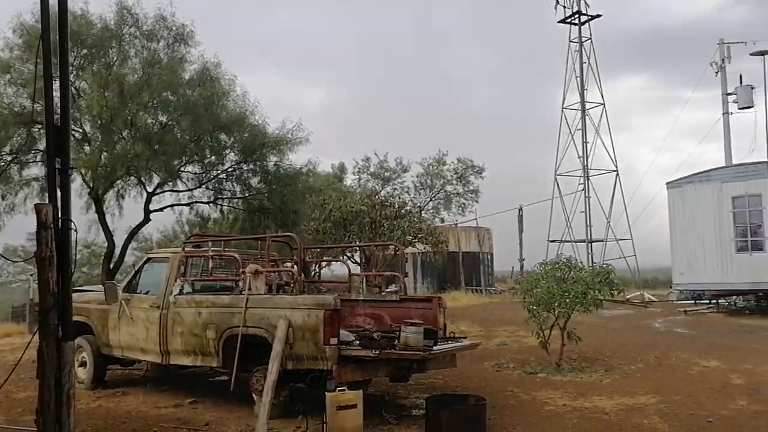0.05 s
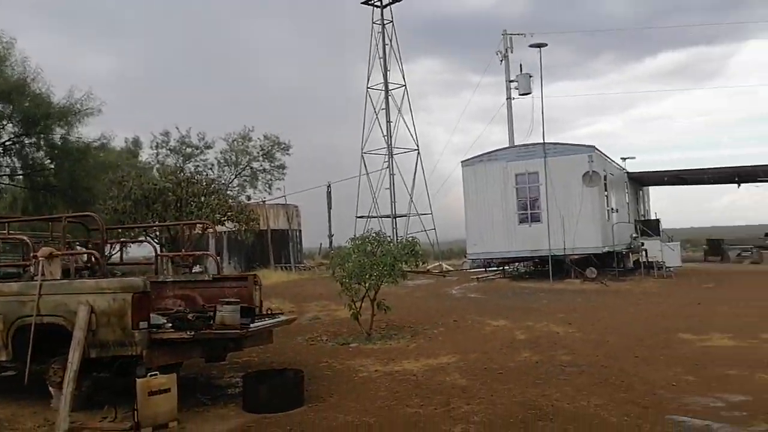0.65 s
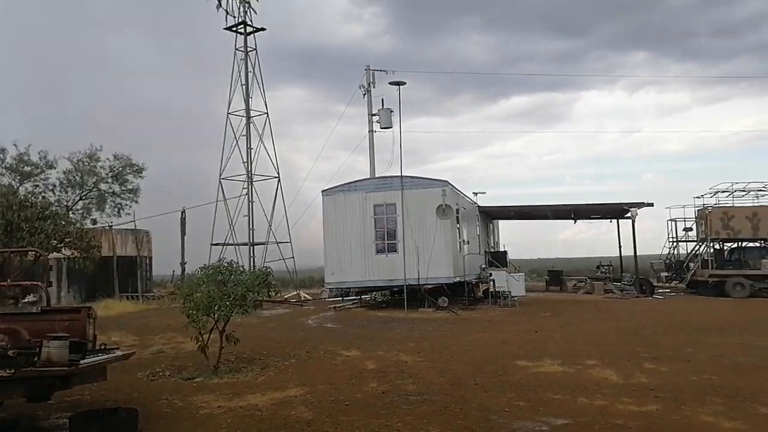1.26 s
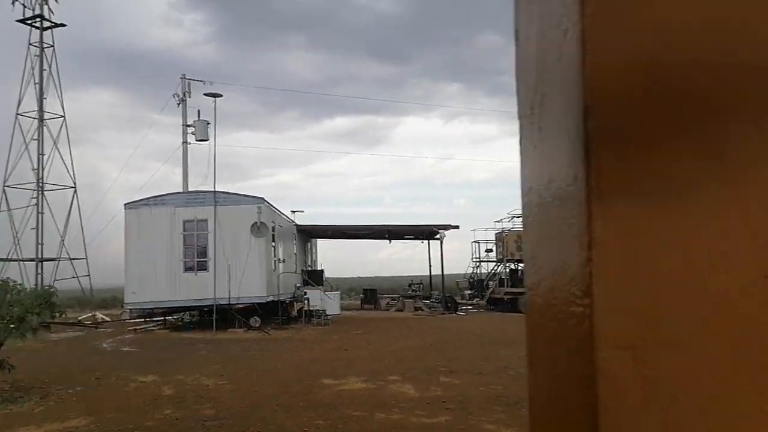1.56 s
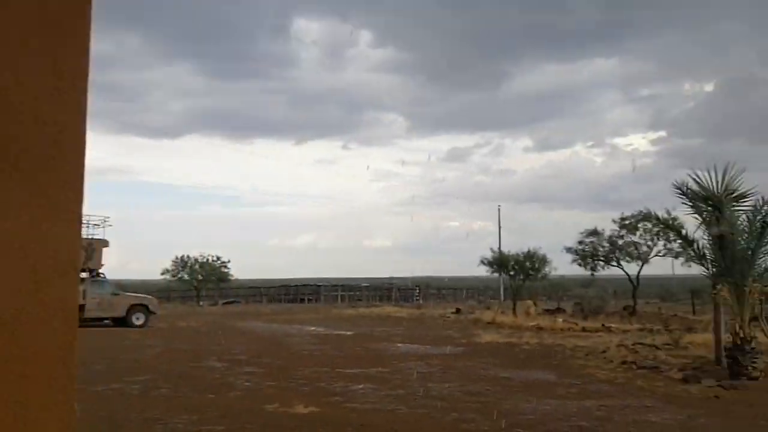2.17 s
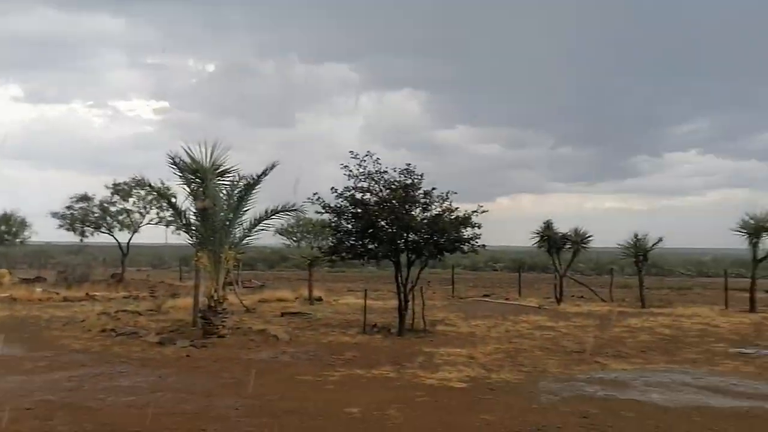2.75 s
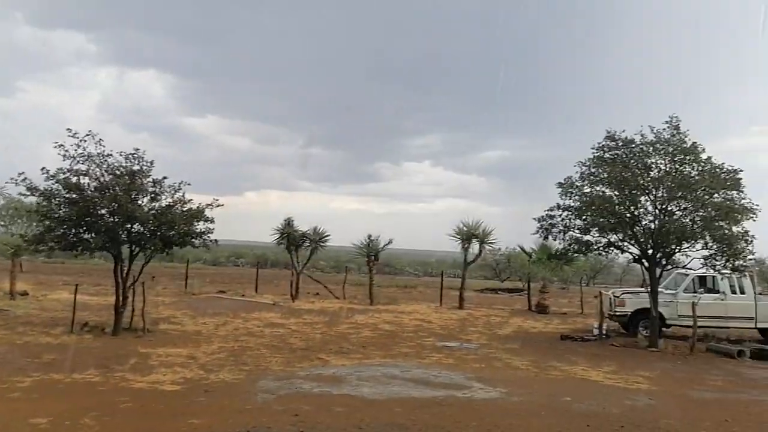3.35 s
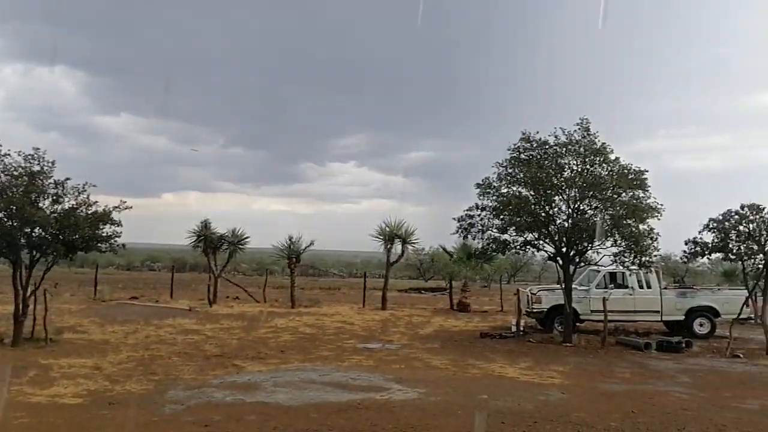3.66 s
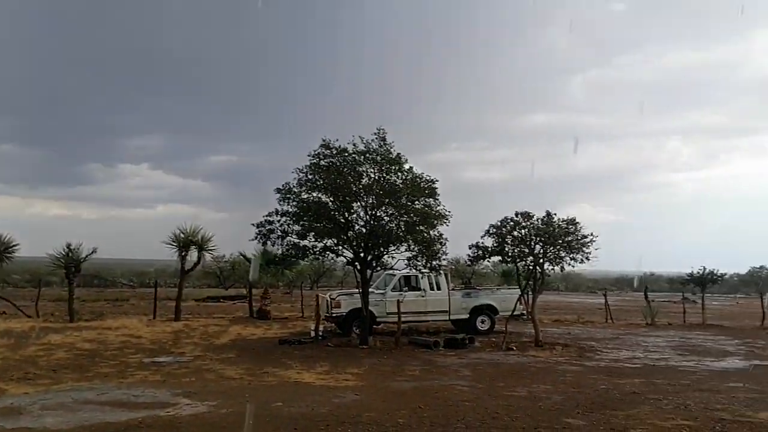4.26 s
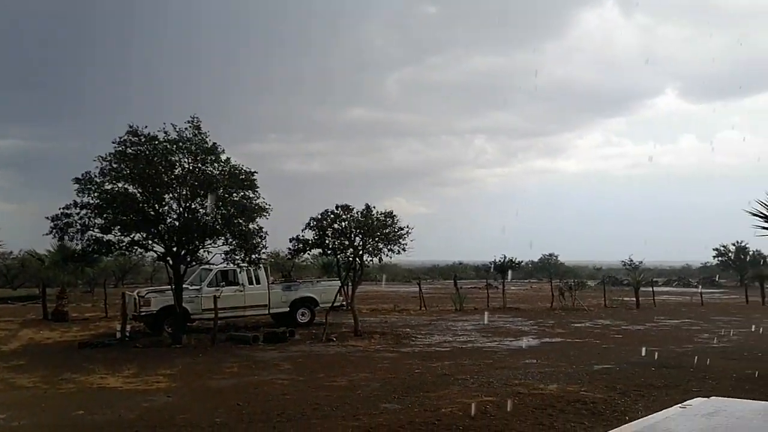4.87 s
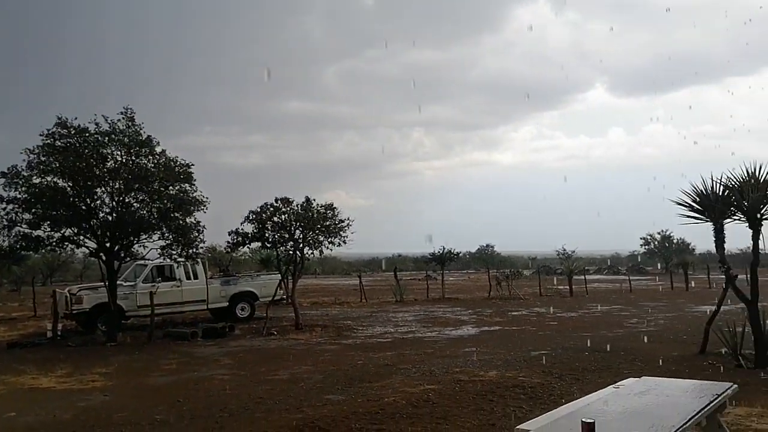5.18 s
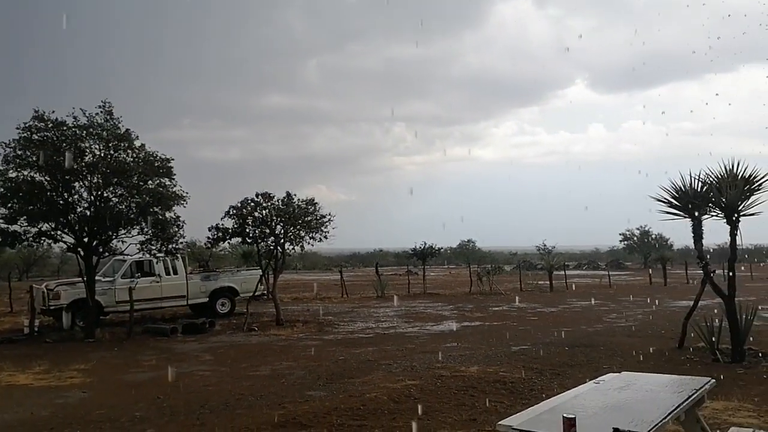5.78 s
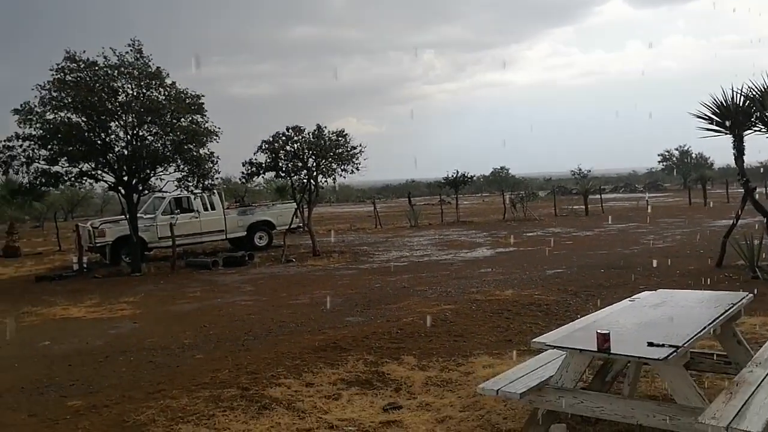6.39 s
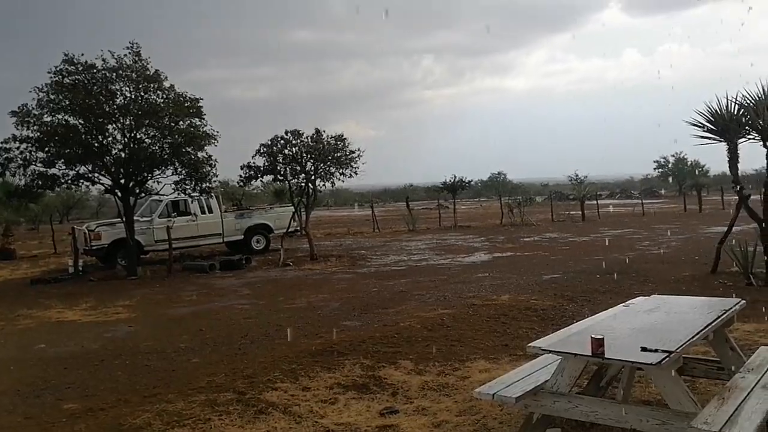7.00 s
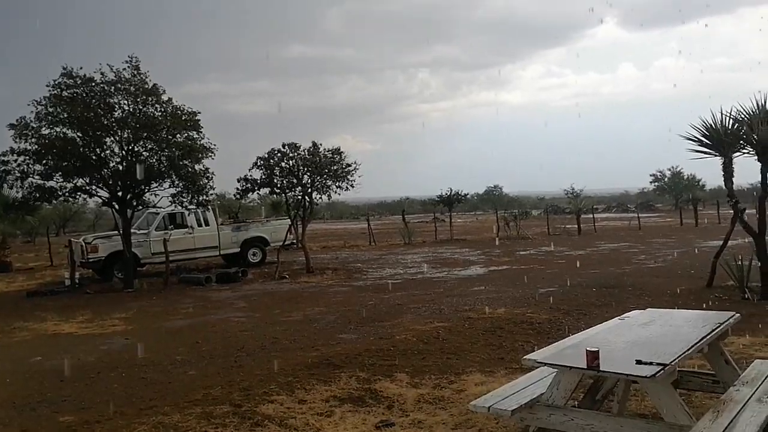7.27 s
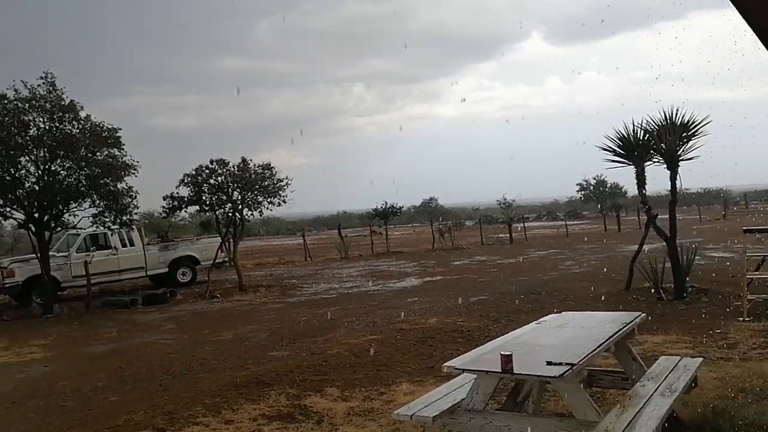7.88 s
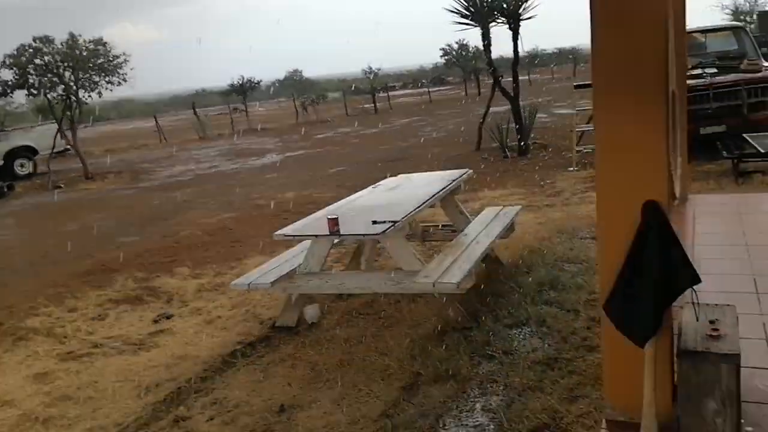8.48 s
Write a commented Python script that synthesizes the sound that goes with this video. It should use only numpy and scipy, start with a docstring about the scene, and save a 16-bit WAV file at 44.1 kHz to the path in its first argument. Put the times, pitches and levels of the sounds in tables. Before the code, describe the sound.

Light rain falls steadily on a dirt yard, heard from a small microphone under a porch roof. Wind buffets the microphone at first, then a loose metal fitting rattles briefly. Faint drumming on distant sheet metal fades away, while close drops tick and spatter and bigger drips tap the ground. Near the end a door bumps and shuts with a boom, a wooden slap and a clattering latch as the rain continues.

```python
"""Steady light rain on a dirt yard, heard from one small microphone under a porch roof.
Far off, countless drops merge into a wash, and sheet metal drums until the microphone turns away.
Close by, drops tick and spatter and big drips tap the ground, echoed by the roof and walls.
Wind buffets the microphone, hardest at first, and a loose metal fitting rattles early on.
Near the end a door bumps and shuts: its panel booms, the wood slaps and the latch clatters."""
import sys
import numpy as np
from scipy import signal
from scipy.fft import rfft, irfft, next_fast_len
from scipy.io import wavfile
from scipy.ndimage import uniform_filter1d

SR = 44100
rng = np.random.default_rng(int(sys.argv[2]) if len(sys.argv) > 2 else 0)


def file_out(sig):
    """Save sig as 16-bit WAV at sys.argv[1]."""
    # one column per channel
    cols = np.atleast_2d(sig).T
    # limit, then scale
    lim = np.clip(cols, -1, 1)
    pcm = np.round(lim * 32767).astype(np.int16)
    wavfile.write(sys.argv[1], SR, pcm)


N = 376613
TIME = np.arange(N) / SR

# spectra of the far rain, the yard's murmur and the hiss of fine spray: f/Hz, level/dB
MURMUR_COLOUR = [(30, -14.5), (100, -15), (170, -4), (280, 1), (420, -3.5), (650, -6.5), (1000, -8),
                 (1450, -9.5), (2300, -6), (3200, -9.5), (4000, -15.5), (5200, -29), (8000, -66)]
SPRAY_COLOUR = [(2100, -25.5), (3400, -20), (4200, -1.5), (5100, 8), (5900, 6.5), (6900, 5), (7400, 5),
                (7800, -5.5)]
# course of the far rain: t/s, murmur level/dB, spray level/dB
RAIN_LEVELS = [(0.0, -61, -58.5), (0.19, -61, -57.5), (1.57, -59, -54.5), (2.71, -60.5, -57.5),
               (2.95, -60.5, -55), (3.92, -62, -56.5), (4.26, -61.5, -56), (6.35, -60.5, -56.5),
               (7.09, -59.5, -54.5), (7.52, -60.5, -55.5), (8.13, -60.5, -54.5), (8.54, -57.5, -52)]
# strength of the near drops by pitch: f/Hz, level/dB
NEAR_DROP_COLOUR = [(1800, -13.5), (2600, -7), (3300, 0.5), (3900, -7), (5100, 12), (5900, -12.5),
                    (7000, 4.5), (7500, -3)]

# gusts on the microphone: t/s, hold/s, level/dB
WIND_GUSTS = [(0.057, .19, -30.5), (0.303, 0.23, -37.5), (0.529, 0.23, -33.5), (0.798, 0.058, -38),
              (1.184, 0.5, -44.5), (1.306, .11, -39), (2.1, .34, -63), (5.1, .14, -60.5),
              (5.646, .025, -52), (5.932, .13, -48.5), (6.418, 0.36, -60.5), (6.93, 0.27, -52.5),
              (7.402, .03, -51), (7.803, 0.039, -45), (8.0, 0.037, -48), (8.237, 0.16, -56)]
# spectra of a light breeze, a full gust and the small eddies riding on large ones: f/Hz, level/dB
BREEZE_COLOUR = [(15, -4), (35, 4.5), (80, 6), (130, -5.5), (200, -17.5), (300, -33.5), (600, -55),
                 (1200, -79.5)]
GUST_COLOUR = [(15, -5), (40, -4.5), (110, 0.5), (190, -5), (300, -14), (450, -24), (700, -49), (1200, -64),
               (2500, -91)]
SPUTTER_COLOUR = [(100, -24), (250, 2), (450, 2), (700, -15), (950, -44), (1600, -62.5)]
# the strongest eddies that slap the microphone: t/s, level/dB, f/Hz
STRONG_EDDIES = [(0.063, -19, 152), (0.132, -19, 170), (.193, -24, 200), (0.242, -13.5, 158),
                 (0.249, -15, 324), (.323, -23.5, 218), (0.535, -23, 308), (0.551, -16.5, 135),
                 (.565, -25, 333), (.577, -21.5, 308), (0.637, -20, 320), (0.716, -21, 190),
                 (.763, -24.5, 270)]

# big drips on the ground: t/s, relative level/dB, f/Hz
BIG_DRIPS = [(0.7182, -37.5, 5500), (1.2295, -44, 6400), (1.8864, -43, 6660), (2.8738, -28.5, 4990),
             (3.373, -45, 2700), (3.669, -43.5, 6060), (3.791, -37.5, 5100), (3.9234, -45, 5200),
             (4.1592, -43, 5200), (4.1944, -36.5, 4860), (4.6503, -42, 5060), (4.6955, -42, 5300),
             (5.3627, -39.5, 5950), (5.672, -47.5, 1950), (5.796, -44, 6340), (5.9706, -41.5, 7000),
             (6.09, -42, 6340), (6.114, -42, 6860), (6.56, -43.5, 3370), (6.743, -41, 5860),
             (6.8575, -42, 6400), (7.1278, -33, 4830), (8.062, -39.5, 3170), (8.522, -35.5, 3530)]

# knocks of the loose metal fitting: t/s, level/dB
FITTING_KNOCKS = [(1.536, -38.5), (1.54, -43.5), (1.552, -40), (1.561, -42.5), (1.592, -44.5), (1.620, -50)]
# spectrum of one knock: f/Hz, level/dB
KNOCK_COLOUR = [(200, -22), (380, 1.5), (820, -1), (1200, -5), (1500, -12.5), (2500, -13), (3100, -4),
                (4000, -13.5), (4500, -6), (5500, -4.5), (6200, -23), (7000, -12.5), (7800, -20)]
# modes of the fitting: f/Hz, level/dB, t60/s
FITTING_MODES = [(416.5, 3.5, 0.22), (836, 0.5, 0.18), (1244, -7, 0.12), (3120, -9, 0.12), (4560, 1, 0.2),
                 (4670, -7, 0.17), (5340, -5, 0.22), (5400, -10, 0.23), (6970, -9, .12)]

# blows of the door: t/s, thud level/dB, slap level/dB, latch level/dB, rise/s, hardness/(dB per octave)
DOOR_IMPACTS = [(6.857, -31, -39.5, -68, 0.00075, 1.5), (7.075, -52, -65, -43.5, 0.001, -10),
                (7.146, -23.5, -42, -45, 0.0045, -2), (7.172, -38, -36, -34.5, 0.0048, 1),
                (7.219, -43.5, -42, -33.5, 0.0049, 1)]
# modes of the door panel: f/Hz, level/dB, t60/s
PANEL_MODES = [(147, 2.5, 0.23), (181, -1.5, 0.36), (201, -7.5, 0.52), (242, -12, 0.17), (305.4, 3.5, 0.17),
               (355, 3.5, 0.21), (408, 2.5, 0.27), (503, -15, 0.19), (604, -4.5, 0.28), (680, -5, 0.3),
               (1026, -18, 0.35), (1299, -16.5, 0.35), (1670, -22, 0.28), (1790, -20, .22),
               (2030, -17, .18)]
# spectra of the panel's thud, the wooden slap and the latch: f/Hz, level/dB
THUD_COLOUR = [(60, -32), (130, -5), (330, 1.5), (520, -6), (750, -11.5), (1200, -27), (3000, -63)]
SLAP_COLOUR = [(300, -11), (700, 6.5), (1400, 0), (2100, 2), (2800, -15), (4000, -36), (7500, -38)]
LATCH_COLOUR = [(1500, -13.5), (3200, 0.5), (3900, -6.5), (4700, 4), (5500, 1.5), (6300, -2), (7050, 1),
                (7700, -14.5)]

# response of the microphone, with a notch and a port resonance: f/Hz, level/dB
MIC_RESPONSE = [(20, 0), (3100, -0.5), (3850, -4), (4700, -3), (6100, 2), (6600, 6.5), (7000, 11),
                (7300, 6), (7600, -7), (7850, -30.5), (8300, -38)]


def amp(db):
    """Decibels to gain."""
    return 10 ** (np.asarray(db) / 20)


def unit_rms(x):
    """Scales to rms 1."""
    return x / np.sqrt(np.mean(x ** 2) + 1e-20)


def level_at(colour, hz):
    """A spectrum's level in dB, joined on a log-frequency axis."""
    f, db = np.transpose(colour)
    return np.interp(np.log(hz + 1), np.log(f + 1), db)


def ramp(start_s, length_s):
    """Rises evenly from 0 to 1, then stays."""
    return np.clip((TIME - start_s) / length_s, 0, 1)


def add(mix, s, sound):
    """Adds a sound to the mix at time s."""
    part = mix[max(round(s * SR), 0):][:len(sound)]
    part += sound[:len(part)]


def noise(colour, size):
    """Noise of rms 1 with a given spectrum."""
    gain = amp(level_at(colour, np.fft.rfftfreq(size, 1 / SR)))
    return unit_rms(irfft(rfft(rng.standard_normal(size)) * gain, size))


def burst(colour, t, t60):
    """Modes too dense to tell apart: dying noise."""
    return noise(colour, len(t)) * amp(-60 * t / t60)


def shower(colour, patch_db, flicker_db):
    """Countless far drops: noise with drifting patches and a quick flicker shared by all pitches."""
    hz = np.fft.rfftfreq(512, 1 / SR)
    real, imag, patches = rng.standard_normal((3, N // 128 + 5, len(hz)))
    patches = uniform_filter1d(patches, size=16, axis=0)  # smooth in time
    patches = unit_rms(uniform_filter1d(patches, size=9, axis=1))  # and in pitch
    flicker = unit_rms(uniform_filter1d(rng.standard_normal(len(real)), size=5))[:, None]
    field = (real + 1j * imag) * amp(level_at(colour, hz) + patch_db * patches + flicker_db * flicker)
    return unit_rms(signal.istft(field.T, nperseg=512, noverlap=384)[1][:N])


def far_rain(murmur_gain_db=4.0, spray_gain_db=-5.0, swell_db=0.64):
    """The wash of the whole yard from a distance: a low murmur under spray that comes in waves."""
    times, murmur_db, spray_db = np.transpose(RAIN_LEVELS)
    swell = noise([(.3, -6.5), (2.5, 0.5), (6, -18.5), (20, -70), (100, -120)], N)
    murmur = shower(MURMUR_COLOUR, patch_db=1.1, flicker_db=0.9)
    murmur *= amp(np.interp(TIME, times, murmur_db) + murmur_gain_db)
    spray = shower(SPRAY_COLOUR, patch_db=1.0, flicker_db=1.0)
    spray *= amp(np.interp(TIME, times, spray_db) + spray_gain_db + swell_db * swell)
    return murmur + spray


def sheet_metal(level_db=-63.5, turned_away_db=-12):
    """Hollow drumming on sheet metal across the yard, fading as the microphone turns away."""
    drumming = noise([(500, -49.0), (800, -8.0), (970, -2.0), (1150, -8.0), (1700, -32.0)], N)
    return amp(level_db + turned_away_db * ramp(start_s=2.12, length_s=0.65)) * drumming


def tick(hz, t60):
    """The impact of a drop: a few cycles with a soft start, of energy 1."""
    t = np.arange(1024) / SR
    wave = np.sin(2 * np.pi * hz * t) * amp(-60 * t / t60) * (1 - np.exp(-t / 0.00015))
    return wave / np.linalg.norm(wave)


def splat(hz, t60, splash_db, splash_t60):
    """A drop on wet ground: the impact, then a brief fizz of spray around the same pitch."""
    t = np.arange(2048) / SR
    band = [(hz / 2, -30), (hz * .8, -5), (hz, 0), (hz * 1.25, -5), (hz * 2, -30)]
    spray = burst(band, t, splash_t60) * (1 - np.exp(-t / 0.00056))
    out = amp(splash_db) * spray / np.linalg.norm(spray)
    add(out, 0, tick(hz, t60))
    return out


def porch(x, wet_db, t60, echoes_per_s=2500):
    """Adds scattered reflections from the roof and walls around the microphone."""
    t = np.arange(SR // 2) / SR
    echoes = rng.standard_normal(len(t)) * (rng.random(len(t)) < echoes_per_s / SR)
    echoes *= (t > .004) * amp(-60 * t / t60)
    return x + amp(wet_db) * signal.oaconvolve(x, echoes / np.linalg.norm(echoes))[:N]


def build_up_db(start_db=-7.5):
    """Near drops grow stronger as the shower builds up, then hold."""
    return start_db * (1 - ramp(start_s=0, length_s=3.9))


def near_drops(per_s=420, level_db=-58, spread_db=5.0, splash_db=-4.5, kinds=30):
    """Drops of every size land at random by the porch, each kind with its own pitch and splash."""
    out = np.zeros(N)
    for hz in np.linspace(1500, 7400, kinds):
        count = rng.poisson(per_s * N / SR / kinds)
        hits = np.zeros(N)
        sizes = np.minimum(rng.exponential(1, count), 3.0)
        hits[rng.integers(0, N, count)] = amp(spread_db * sizes)
        t60 = .0016 * 5 ** (rng.random() ** 2)  # most land dead, a few ring
        drop = splat(hz, t60, splash_db + rng.uniform(-4, 4), splash_t60=0.028)
        out += amp(level_at(NEAR_DROP_COLOUR, hz)) * signal.oaconvolve(hits, drop)[:N]
    return amp(level_db + build_up_db()) * unit_rms(porch(out, wet_db=-7.0, t60=0.34))


def wind_strength_db(start_db=-56.5, calm_db=-69.5, attack_s=0.035, release_s=0.025):
    """Each gust swells, holds and dies away, over air that settles from a light breeze to calm."""
    power = amp(start_db + (calm_db - start_db) * ramp(start_s=0, length_s=3.1)) ** 2
    for s, hold, db in WIND_GUSTS:
        outside_hold = np.maximum((s - TIME) / attack_s, (TIME - s - hold) / release_s)
        power += (amp(db) * np.exp(-np.clip(outside_hold, 0, 20))) ** 2
    return 10 * np.log10(power)


def wind(gust_db=-33, breeze_db=-50, sputter_db=-22, flutter_db=2.0):
    """Turbulence right on the microphone: stronger wind is brighter and sputters."""
    strength_db = wind_strength_db()
    gusty = np.clip((strength_db - breeze_db) / (gust_db - breeze_db), 0, 1)
    flow = (1 - gusty) * noise(BREEZE_COLOUR, N) + gusty * noise(GUST_COLOUR, N)
    flow /= np.sqrt(uniform_filter1d(flow ** 2, size=3000) + 1e-9)  # even out chance swells
    flutter = noise([(5, -2.5), (30, 2.5), (70, -22), (200, -69.5)], N)  # the flow catches and lets go
    flow *= unit_rms(amp(flutter_db * flutter))
    pressure_peaks = unit_rms(np.maximum(flow, 0) ** 2)
    sputter = gusty ** 2 * pressure_peaks * noise(SPUTTER_COLOUR, N)
    return amp(strength_db) * (flow + amp(sputter_db) * sputter)


def eddies():
    """Single eddies slap the microphone, each one pressure peak between two troughs."""
    out, t = np.zeros(N), np.arange(-1024, 1024) / SR
    for s, db, hz in STRONG_EDDIES:
        u = (np.pi * hz * t) ** 2
        add(out, s + t[0], amp(db) * (1 - 2 * u) * np.exp(-u))
    return out


def small_drips(per_s=2, relative_db=-49, spread_db=1.5, centre_hz=5000, spread_hz=1000):
    """Smaller drips fall at random: rows like those of BIG_DRIPS."""
    when, size, pitch = rng.random((round(per_s * N / SR), 3)).T
    db = relative_db + spread_db * (2 * size - 1) + build_up_db()[(when * N).astype(int)]
    hz = centre_hz + spread_hz * (2 * pitch - 1)
    return list(zip(when * N / SR, db, hz))


def drips(gain_db=19, splash_db=-13, flight_s=0.029):
    """Each drip taps the ground close by and throws four droplets that land just after it."""
    out, rows = np.zeros(N), BIG_DRIPS + small_drips()
    for (s, db, hz), droplets in zip(rows, rng.random((len(rows), 4, 3))):
        t60 = .0022 * (5000 / hz) ** 1.9  # low drips ring longer
        add(out, s, amp(db + gain_db) * tick(hz, t60))
        for flight, smallness, pitch in droplets:
            landing = s + 0.0065 - flight_s * np.log(1 - flight)
            droplet_db = db + gain_db + splash_db - 6.5 * smallness
            add(out, landing, amp(droplet_db) * tick(hz * (.85 + .3 * pitch), t60))
    return porch(out, wet_db=-7.0, t60=0.14)


def ringing(modes, t):
    """Dying modes, each struck with a chance phase; rms 1 at the start."""
    hz, db, t60 = np.transpose(modes)[:, :, None]
    waves = amp(db - 60 * t / t60) * np.sin(2 * np.pi * (hz * t + rng.random(hz.shape)))
    return waves.sum(0) / np.sqrt(np.sum(amp(db) ** 2) / 2)


def rattle(modes_db=-4, rise_s=0.0014):
    """A loose metal fitting knocks several times and rings briefly."""
    out, t = np.zeros(N), np.arange(SR // 2) / SR
    for s, db in FITTING_KNOCKS:
        knock = burst(KNOCK_COLOUR, t, t60=0.14) + amp(modes_db) * ringing(FITTING_MODES, t)
        add(out, s, amp(db) * knock * (1 - np.exp(-t / rise_s)))
    return out


def door(modes_db=-1.0, dense_db=-8, swell_s=0.0095):
    """The panel booms after each blow, while the wood slaps and the latch clatters."""
    out, t = np.zeros(N), np.arange(SR // 2) / SR
    for s, thud_db, slap_db, latch_db, rise_s, hardness in DOOR_IMPACTS:
        # hard blows favour high modes
        modes = [(hz, db + hardness * np.log2(hz), t60) for hz, db, t60 in PANEL_MODES]
        thud = [(hz, db + hardness * np.log2(hz)) for hz, db in THUD_COLOUR]
        panel = amp(modes_db) * ringing(modes, t) + amp(dense_db) * burst(thud, t, t60=0.41)
        boom = amp(thud_db) * panel * (1 - np.exp(-t / swell_s))
        slap = amp(slap_db) * burst(SLAP_COLOUR, t, t60=0.21)
        latch = amp(latch_db) * burst(LATCH_COLOUR, t, t60=0.16)
        add(out, s, boom + (slap + latch) * (1 - np.exp(-t / rise_s)))
    return out


def scene():
    """Everything that reaches the one microphone under the porch roof."""
    rain = far_rain() + sheet_metal() + near_drops() + drips()
    return (rain + wind() + eddies() + door() + rattle())[None]


def record(dry, cutoff_hz=8300):
    """The colour of a small microphone, then a steep low-pass."""
    size = next_fast_len(N + 4096)
    response = amp(level_at(MIC_RESPONSE, np.fft.rfftfreq(size, 1 / SR)))
    coloured = irfft(rfft(dry, size) * response, size)[:, :N]
    lowpass = signal.firwin(301, cutoff_hz, window=("kaiser", 8), fs=SR)
    return signal.oaconvolve(coloured, lowpass[None], "same")


dry = scene()
out = record(dry)
file_out(out)
```